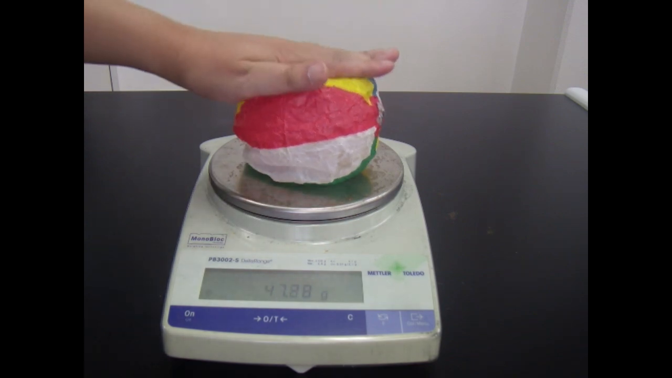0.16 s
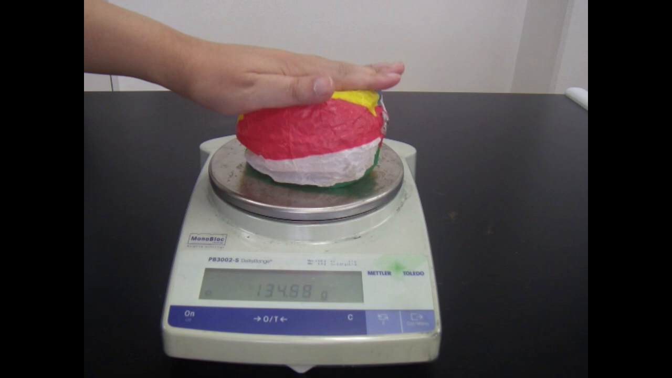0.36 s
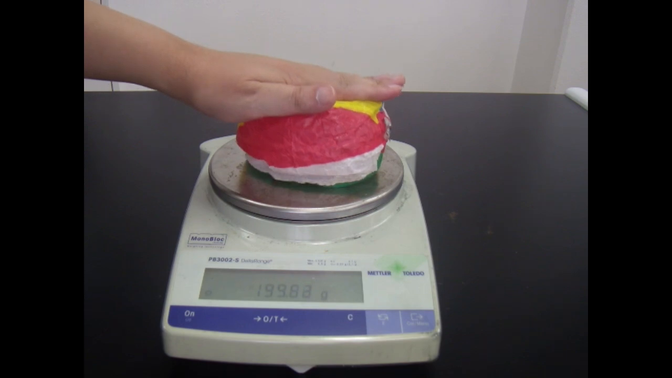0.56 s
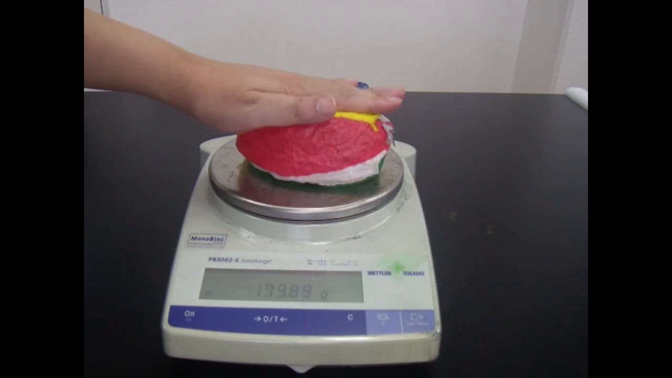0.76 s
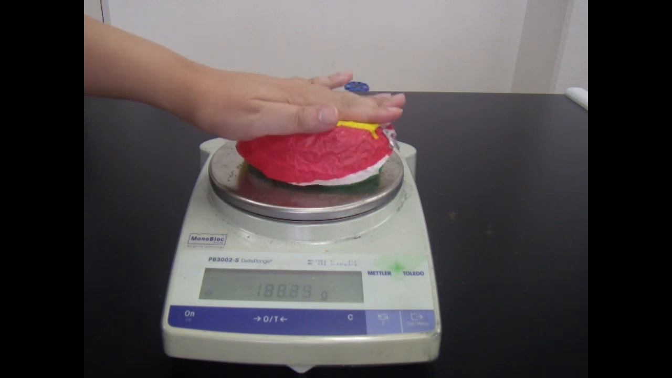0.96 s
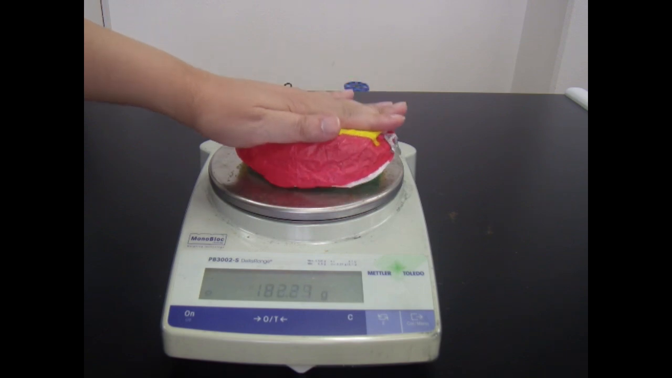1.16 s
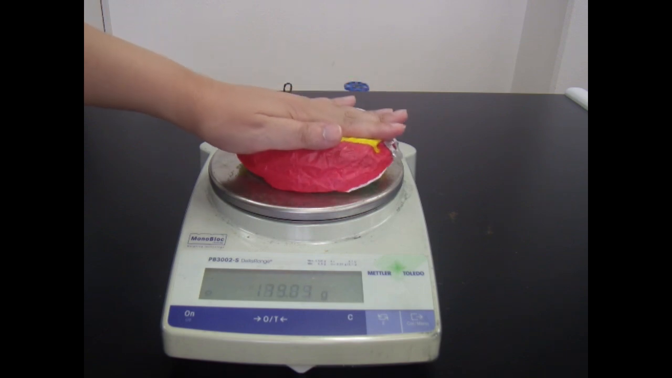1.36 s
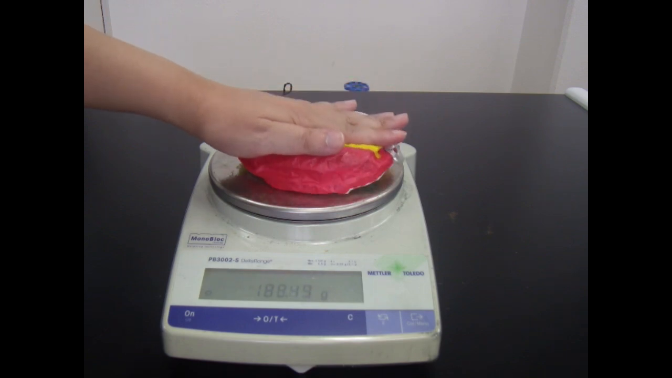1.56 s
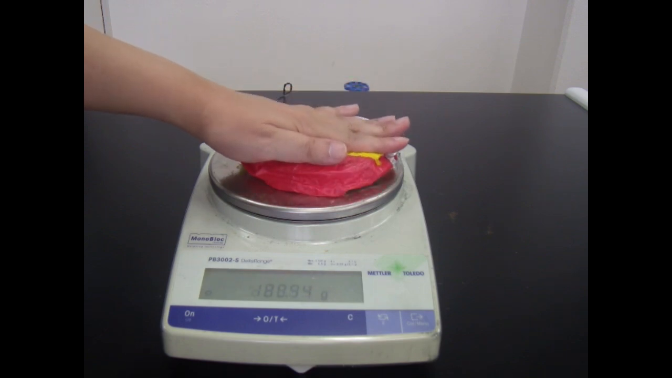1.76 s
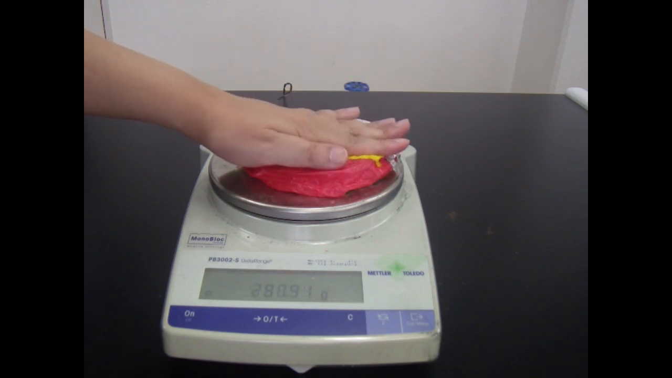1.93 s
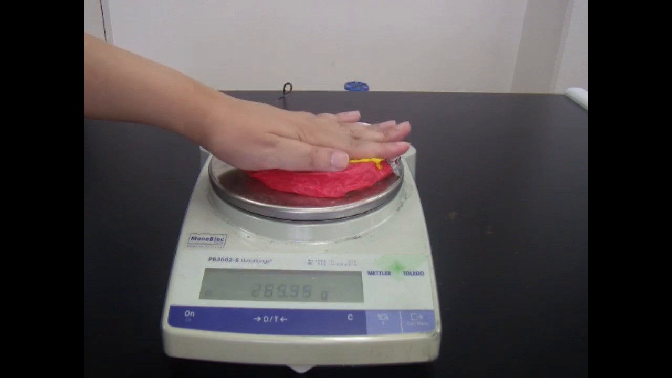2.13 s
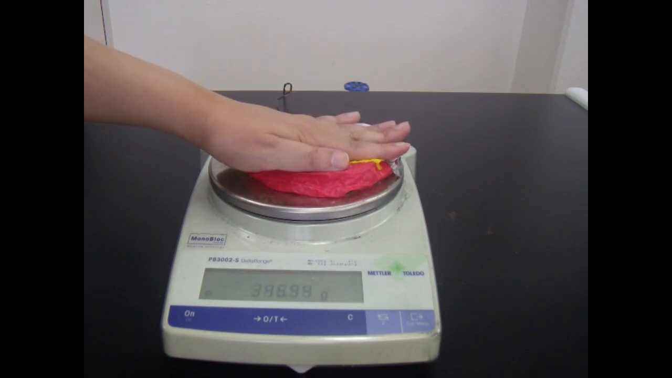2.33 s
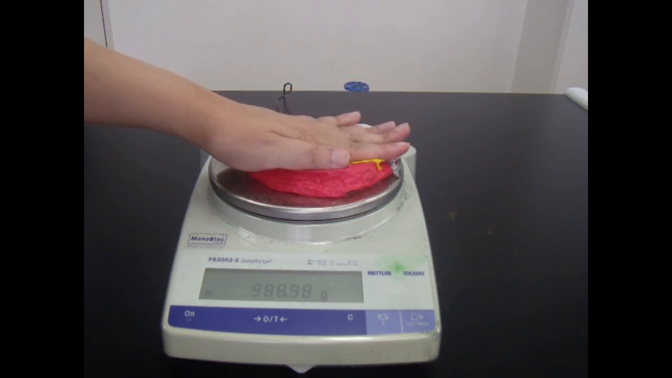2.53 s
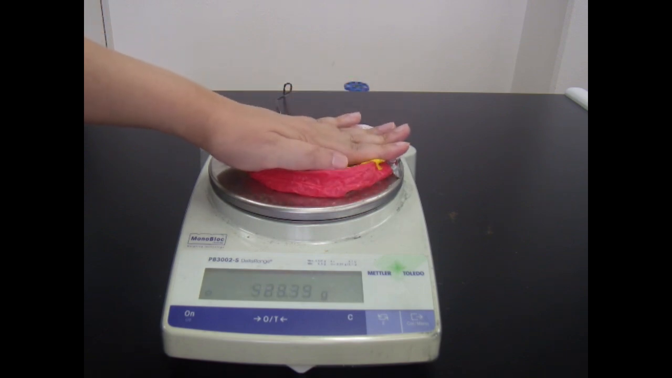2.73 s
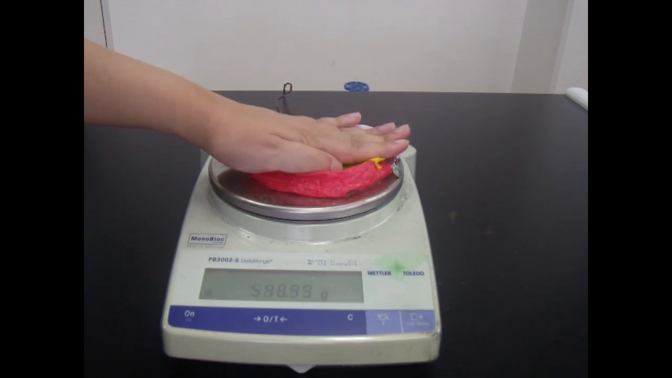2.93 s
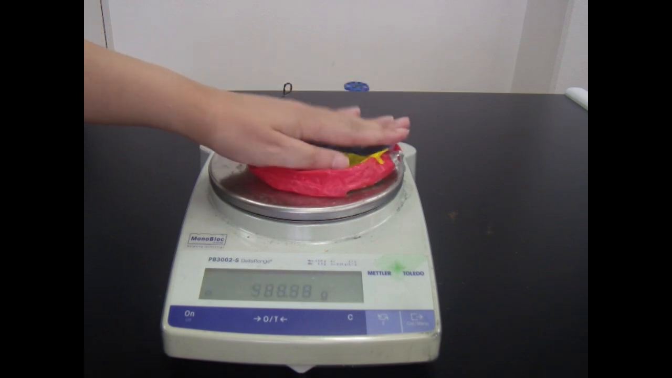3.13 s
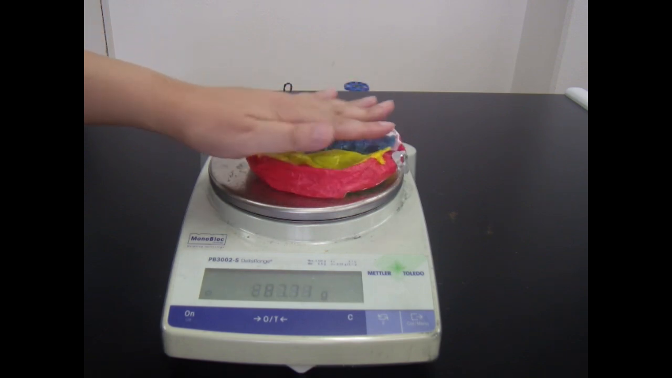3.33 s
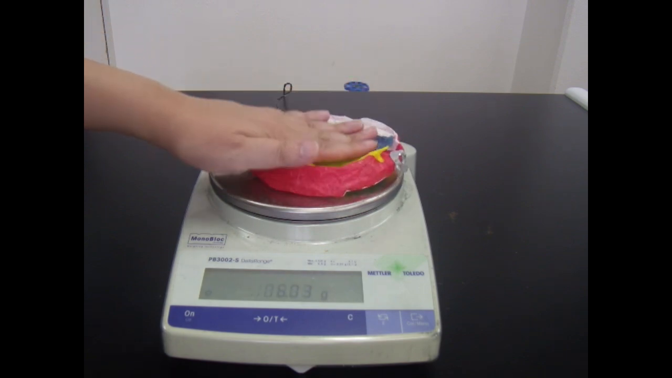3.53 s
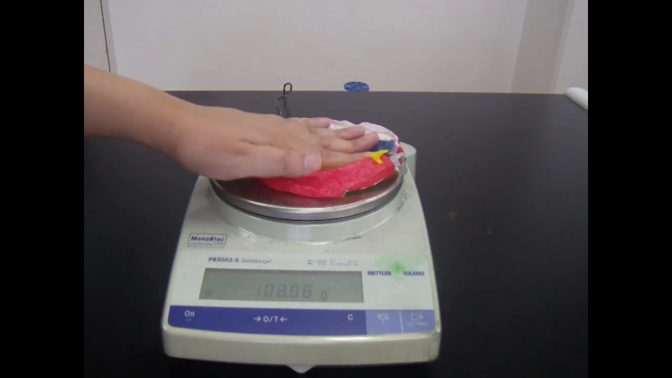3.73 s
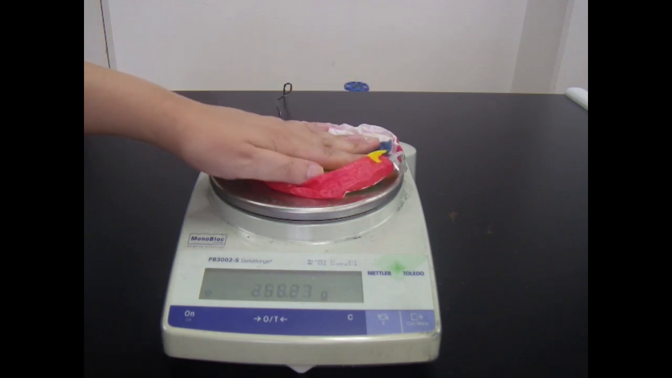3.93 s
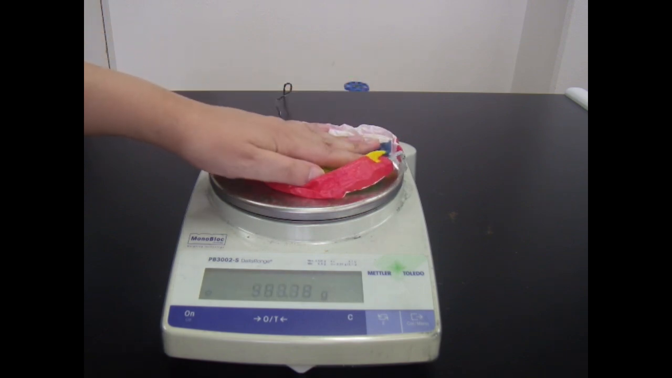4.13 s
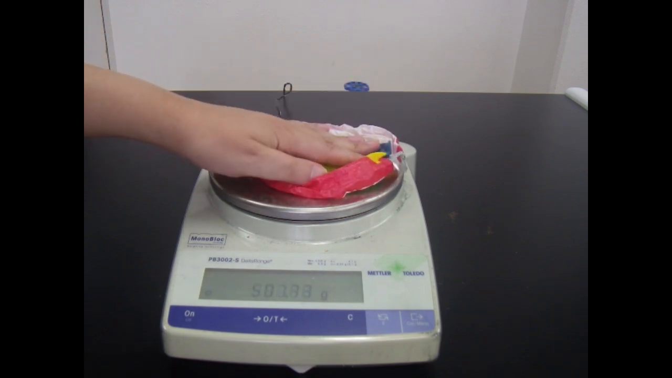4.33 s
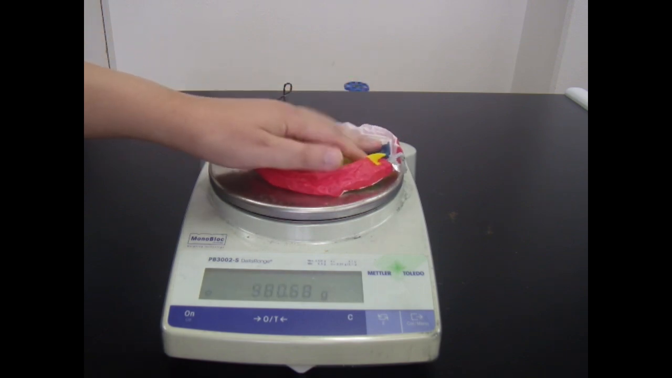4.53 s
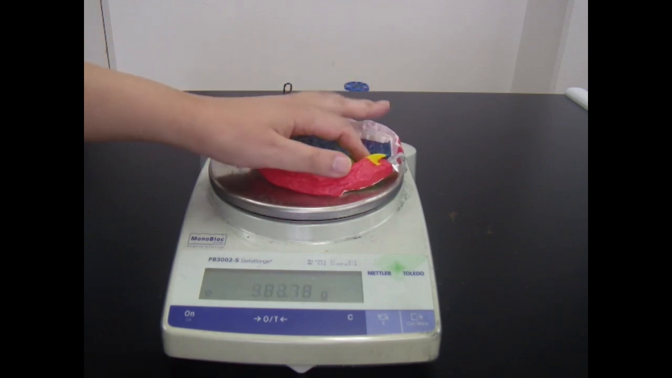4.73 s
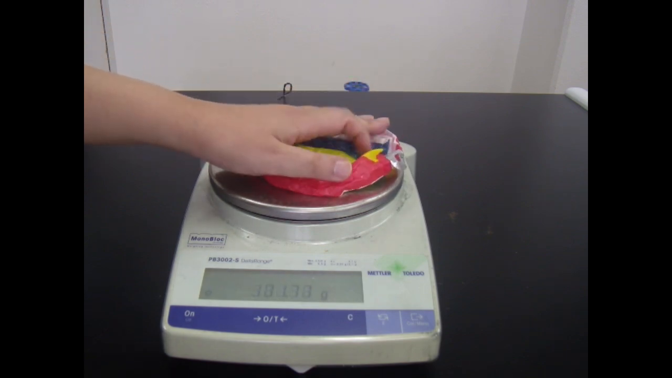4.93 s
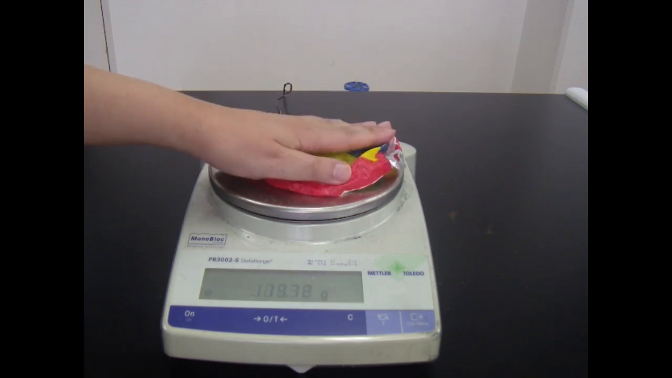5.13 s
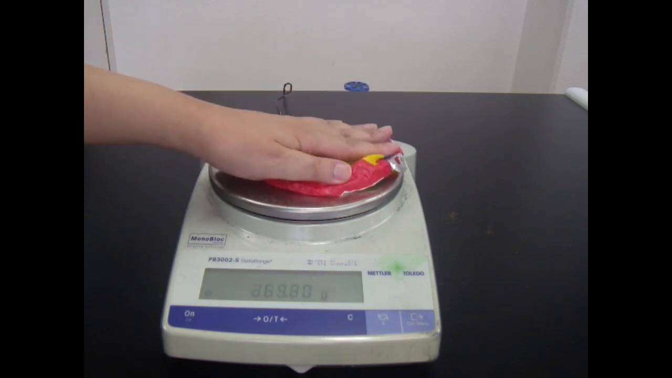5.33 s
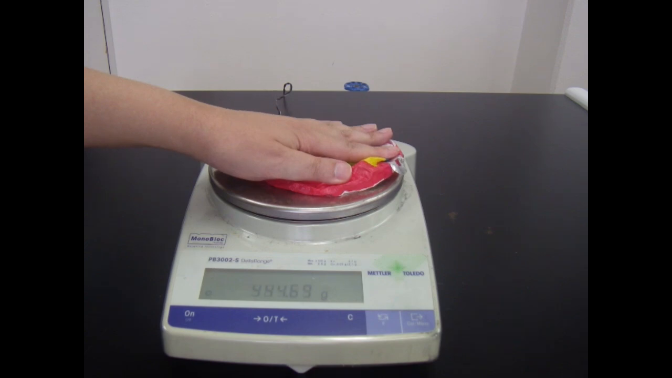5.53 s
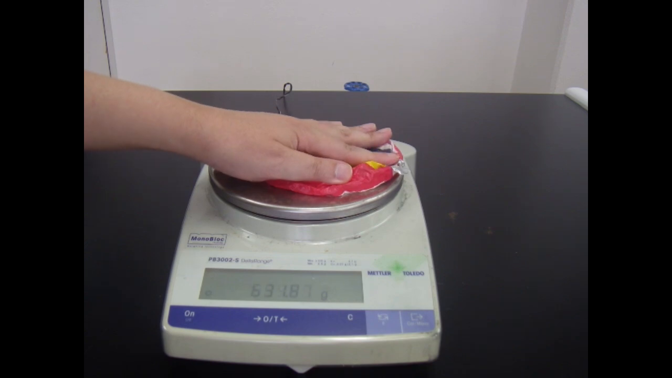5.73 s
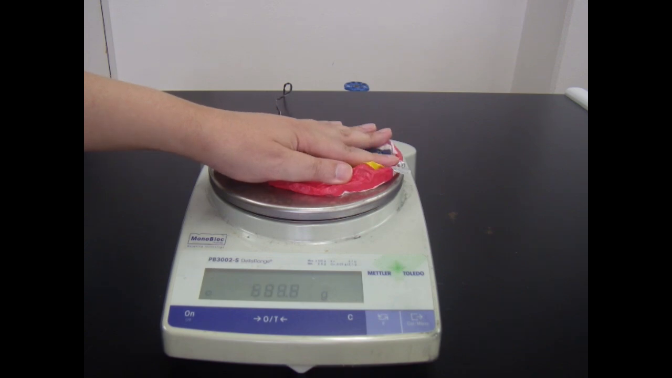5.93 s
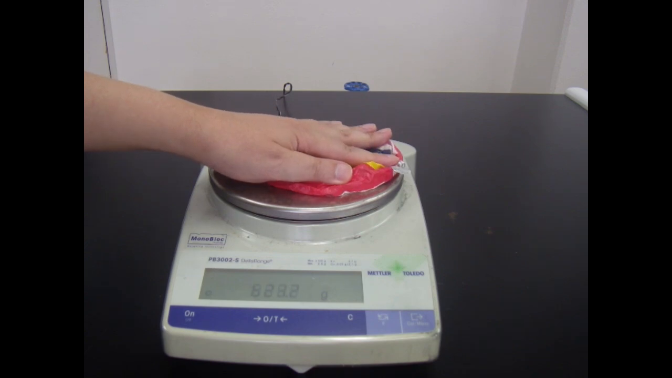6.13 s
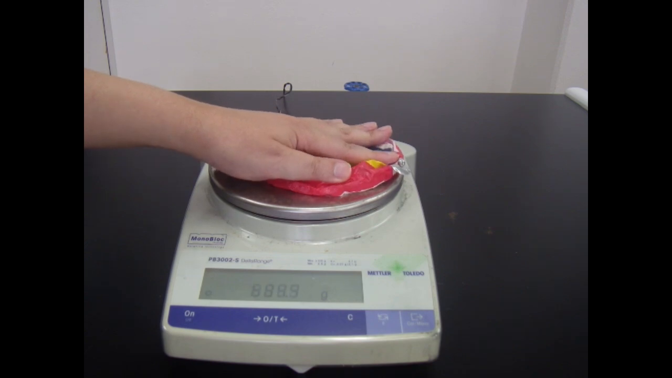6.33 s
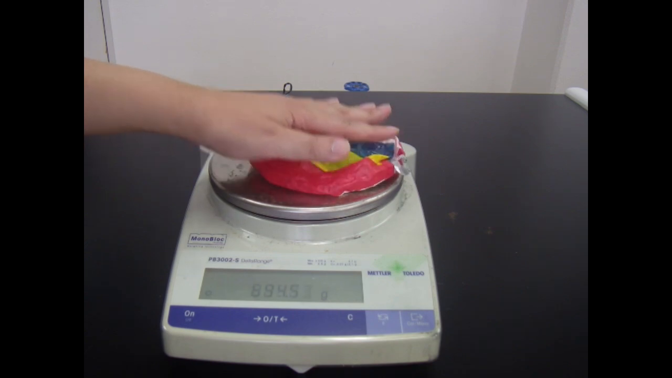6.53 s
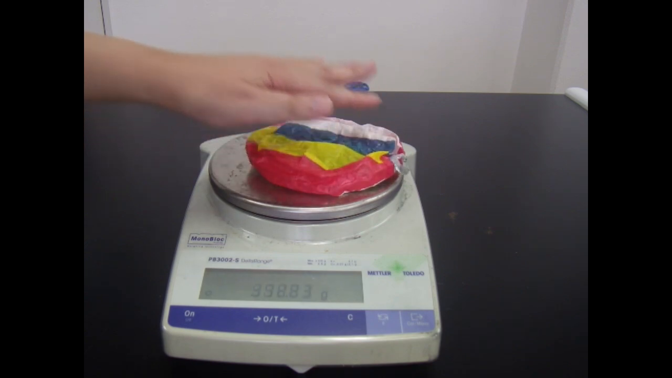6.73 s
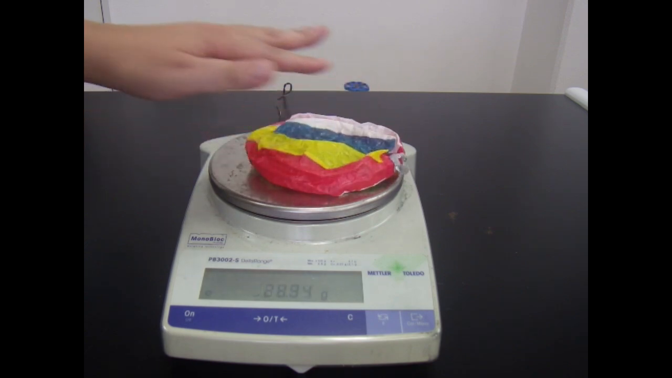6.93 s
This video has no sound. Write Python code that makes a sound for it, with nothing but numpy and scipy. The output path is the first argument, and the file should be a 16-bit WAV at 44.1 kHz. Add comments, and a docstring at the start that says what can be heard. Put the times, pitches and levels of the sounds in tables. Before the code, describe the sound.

A thin paper balloon crinkles and crackles as a hand presses it flat, densely at first, then with more scattered snaps.

```python
"""A thin paper balloon crackles as a hand presses it flat on a metal pan in a quiet room.
Big creases buckle with sharp snaps, each at its own pitch, and the hollow body knocks
when a large patch of paper flips. Finer creases rustle in between as paper rubs on paper.
Faint hiss and a low rumble lie underneath. All of it reaches a small microphone
whose housing rings at a few fixed pitches."""
import sys
import numpy as np
from scipy import signal
from scipy.fft import rfft, irfft
from scipy.io import wavfile

SR = 44100
rng = np.random.default_rng(int(sys.argv[2]) if len(sys.argv) > 2 else 0)


def put_to_file(sound):
    """Save the sound as 16-bit audio at rate SR, in the file named by the first command-line argument."""
    columns = np.atleast_2d(sound).T  # one column per channel
    safe = np.clip(columns, -1, 1)
    whole_steps = np.round(safe * 32767)
    wavfile.write(sys.argv[1], SR, whole_steps.astype(np.int16))


N = 312166


def from_db(db):
    """Turn decibels into a number to multiply a sound by."""
    return 10 ** (np.asarray(db) / 20)


def rms_one(x):
    """Scale a signal so its average power is 1."""
    return x / np.sqrt(np.mean(x ** 2) + 1e-20)


def in_time(rows):
    """Join (seconds, value) points with straight lines, one value per sample."""
    seconds, values = np.transpose(rows)
    return np.interp(np.arange(N) / SR, seconds, values)


def band(x, low_hz, high_hz):
    """Keep the part of a sound between two pitches."""
    return signal.sosfilt(signal.butter(2, [low_hz, high_hz], "band", fs=SR, output="sos"), x)


def drift(rate_hz):
    """A smooth random wobble around zero, with a typical size of 1."""
    r = np.exp(-2 * np.pi * rate_hz / SR)
    return rms_one(signal.lfilter([1], [1, -2 * r, r * r], rng.standard_normal(N + SR))[SR:])


# Big creases buckling. Each row: start in seconds, level in dB, pitch in Hz.
BIG_CREASES = [(0.042, -10.5, 3500), (0.0781, -19.5, 5360), (0.1116, -20, 10700), (0.1507, -15.0, 6200),
               (0.1808, -7, 3660), (0.196, -16, 5940), (0.3109, -11, 5810), (0.319, -12.0, 3460),
               (0.3236, -7, 4300), (0.3423, -10, 6400), (0.4047, -4.5, 6200), (0.5259, -3.5, 4200),
               (0.5837, -12.5, 5130), (0.6281, -13, 3940), (0.653, -9.5, 4440), (0.6823, -10.5, 6560),
               (0.7133, -12, 5900), (0.7333, -19, 4440), (0.7881, -9, 5900), (0.8594, -7.5, 5790),
               (0.8924, -7.5, 4100), (0.9544, -12.0, 4600), (1.0408, -13.5, 4460), (1.1075, -20, 5320),
               (1.1436, -8.5, 4000), (1.1506, -11, 6900), (1.2021, -14.5, 4630), (1.2239, -15, 4640),
               (1.3964, -15, 4540), (1.4133, -6.5, 7100), (1.448, -11, 5960), (1.468, -6, 4460),
               (1.4852, -5, 5400), (1.5326, -9.5, 4930), (1.5384, -6, 5980), (1.5652, -10.5, 3600),
               (1.574, -12.5, 9350), (1.6387, -8.5, 7320), (1.7087, -5.5, 4940), (1.727, -14, 4760),
               (1.8125, -13.5, 4700), (1.885, -10.5, 5830), (1.9263, -16.0, 6700), (1.9431, -11, 4860),
               (1.9693, -14.5, 4660), (2.0472, -15.5, 3660), (2.226, -18, 4440), (2.2779, -13, 5700),
               (2.2886, -10, 4170), (2.3543, -10, 4400), (2.384, -15, 4500), (2.525, -26, 5400),
               (2.535, -12.5, 4580), (2.5987, -9.5, 7900), (2.6148, -6.5, 5000), (2.8, -16.0, 5470),
               (2.8526, -15, 4730), (2.9806, -9.5, 4920), (3.2958, -8.5, 5370), (3.4318, -15.5, 5700),
               (3.4417, -13, 4390), (3.4545, -18, 3600), (3.5951, -6.5, 7450), (3.6778, -14.5, 4700),
               (3.7082, -12, 4620), (3.7178, -15, 5100), (3.7211, -7.5, 5700), (3.803, -17, 4550),
               (3.822, -18, 5900), (3.835, -14, 3160), (3.9228, -17, 6640), (3.9652, -19.5, 5800),
               (4.0385, -17, 5120), (4.066, -18, 5530), (4.0884, -10.5, 5600), (4.1628, -16.5, 4970),
               (4.1675, -22, 11200), (4.1919, -21.5, 9300), (4.1975, -17, 5880), (4.3061, -12.5, 7050),
               (4.3282, -8.5, 6610), (4.4211, -6, 5200), (4.4989, -6.5, 5870), (4.523, -11, 4550),
               (4.7758, -18.5, 11750), (4.7891, -15, 5870), (4.8006, -15.5, 6370), (4.851, -12, 5370),
               (4.9268, -14, 5880), (4.9433, -10, 5100), (4.9856, -12, 5100), (5.144, -13.5, 5640),
               (5.2289, -15.5, 6900), (5.2339, -8.5, 5170), (5.3296, -13, 5450), (5.5063, -16.5, 5800),
               (5.558, -11, 5400), (5.5994, -14, 5800), (5.6928, -12.5, 7340), (5.6993, -14, 3230),
               (5.913, -17.5, 3700), (5.9455, -24, 6360), (6.0377, -19, 5120), (6.1204, -24.5, 5400),
               (6.1357, -21, 4600), (6.373, -15, 5320), (6.3876, -7.5, 5230), (6.5036, -15.5, 7700),
               (6.68, -17.5, 3650), (6.7044, -12.5, 5100), (6.7095, -21.5, 7130), (6.7679, -15.5, 5200),
               (6.952, -14.5, 8170)]

def snaps():
    """Big creases buckle one by one: each rings at its pitch over a weaker puff of noise."""
    start_s, level_db, hz = np.transpose(BIG_CREASES)
    starts = (start_s * SR).astype(int)
    puff_db = -5.5
    return creases(starts, level_db + puff_db, hz, scatter_db=2, ring_db=-puff_db, skirt_db=-15)


# The bands of the paper's noise. Each row: low edge in Hz, high edge in Hz, relative strength in dB.
PAPER_BANDS = [(285, 1360, -15.5), (1229, 1590, -6.5), (1875, 2435, -9), (2250, 3400, -10),
               (3754, 4345, -10.5), (4560, 5840, -5.5), (6250, 7750, -9.5), (7600, 11400, -6.5),
               (12000, 21000, -14)]

def creases(starts, level_db, pitch_hz, scatter_db, ring_db, skirt_db=-10.5, rub=0):
    """Each crease rings and puffs noise: most near its pitch, plus a weak 'skirt' in every band."""
    low, high, band_db = np.transpose(PAPER_BANDS)
    octaves_away = np.log2(np.sqrt(low * high)[:, None] / pitch_hz)
    near_pitch = from_db(-12 * octaves_away ** 2)
    share = from_db(band_db)[:, None] * (near_pitch + from_db(skirt_db))
    share *= from_db(scatter_db * rng.standard_normal((len(starts), len(low)))).T
    share = share / np.sqrt(np.sum(share ** 2, axis=0)) * from_db(level_db)
    # Rubbing is duller than buckling: it loses 10 dB per octave above 5000 Hz.
    dulling_db = -10 * np.maximum(np.log2(low / 5000), 0)
    band_rub = from_db(band_db + dulling_db)[:, None] * rub
    # The lowest band fades as the balloon loses its air.
    emptying_db_per_s = -1.5
    share[0] *= from_db(emptying_db_per_s * starts / SR)
    band_rub[0] *= from_db(emptying_db_per_s * np.arange(band_rub.shape[1]) / SR)
    noise = sum(puffs(np.bincount(starts, sizes, N), low_hz, high_hz, rubbing)
                for sizes, low_hz, high_hz, rubbing in zip(share, low, high, band_rub))
    return noise + rings(starts, level_db + ring_db, pitch_hz, fade_s=.0065)


def puffs(clicks, low_hz, high_hz, rub):
    """In one band, each click cracks and puffs noise, over rubbing and a faint echo from the walls."""
    shorten = min(1, 5000 / low_hz)   # treble dies fastest
    puff_s, echo_s = .006 * shorten, .09 * shorten   # time to fade by 60 dB
    rise_s, echo_db, crack_db = .00015, -23, 2.5
    puff = signal.lfilter([1], [1, -from_db(-60 / (puff_s * SR))], clicks + 1e-12)
    echo_power = signal.lfilter([1], [1, -from_db(-120 / (echo_s * SR))], clicks ** 2 + 1e-18)
    r = np.exp(-1 / (rise_s * SR))
    softened_puff = signal.lfilter([1 - r], [1, -r], puff)
    loudness = softened_puff + from_db(echo_db) * np.sqrt(echo_power) + rub
    source = loudness * rng.choice([-1., 1.], N) + from_db(crack_db) * clicks
    return band(source, low_hz, high_hz) * np.sqrt(SR / 2 / (high_hz - low_hz))


def rings(starts, level_db, hz, fade_s):
    """Each ring builds up over its first cycle and dies away by 60 dB in fade_s seconds."""
    age = np.arange(900)   # in samples
    cycles = hz[:, None] * age / SR
    rise = 1 - np.exp(-cycles)
    fade = from_db(level_db[:, None] - 60 * age / SR / fade_s)
    tones = rise * fade * np.sin(2 * np.pi * cycles)
    return np.bincount((starts[:, None] + age).ravel(), tones.ravel(), N + len(age))[:N]


# Large patches of paper flipping. Each row: start in seconds, level in dB, pitch in Hz.
PATCH_FLIPS = [(0.161, -10, 1250), (0.186, -13.5, 1940), (0.312, -13.5, 1480), (0.5255, -13.5, 2350),
               (0.6144, -10, 1360), (0.628, -11.5, 1460), (0.658, -22.5, 790), (0.8473, -11, 1390),
               (0.8917, -15, 1400), (0.9549, -13, 2000), (1.1508, -11, 1990), (1.4472, -11.5, 1310),
               (1.4675, -12.5, 2170), (1.564, -6.5, 2020), (2.3541, -10.5, 1370), (2.715, -14.5, 1420),
               (4.3279, -15, 1360), (4.943, -16.5, 2090), (6.531, -26, 1460), (6.7044, -17, 2580)]

def knocks():
    """A patch flips with a crack, and the balloon's hollow body rings low."""
    start_s, level_db, hz = np.transpose(PATCH_FLIPS)
    starts = (start_s * SR).astype(int)
    crack = creases(starts, level_db - 12, hz, scatter_db=2, ring_db=0)
    return rings(starts, level_db, hz, fade_s=.011) + crack


# The hand's steady weight on the paper. Each row: time in seconds, rustle level in dB.
HAND_WEIGHT = [(0, -28.5), (.75, -28.5), (1.3, -27), (2.1, -31), (2.9, -30.5), (3.14, -31), (3.2, -41),
               (3.4, -51), (3.46, -31), (4.1, -33), (4.7, -36), (5.1, -28.5), (5.8, -35.5), (6.08, -41.5),
               (6.3, -29), (6.48, -41.5), (6.62, -53), (7.08, -46)]
# Folds giving way. Each row: start in seconds, length in seconds, rustle level in dB.
FOLD_CRUMPLES = [(0.154, 0.067, -23.5), (0.312, 0.031, -22), (0.443, 0.095, -29), (0.598, 0.21, -24.5),
                 (0.824, 0.14, -24), (2.71, 0.039, -25.5), (2.962, 0.14, -29), (3.441, 0.018, -25),
                 (3.52, 0.069, -28.5), (4.319, 0.18, -25.5), (4.578, 0.013, -23.5), (4.915, 0.12, -25),
                 (5.511, 0.025, -24), (6.349, 0.064, -28.5), (6.682, 0.084, -40)]

def pressing_db():
    """The rustle's level: the hand's steady press, plus crumples that start fast, hold and settle."""
    rise_db_per_s, fall_db_per_s = 622, 337
    t = np.arange(N) / SR
    power = from_db(2 * in_time(HAND_WEIGHT))   # doubling the dB gives power
    for start, length, level_db in FOLD_CRUMPLES:
        early, late = np.maximum(start - t, 0), np.maximum(t - start - length, 0)
        power += from_db(2 * (level_db - rise_db_per_s * early - fall_db_per_s * late))
    return 10 * np.log10(power)


def rustle(per_s=130, clump_db=2.5, spread_octaves=.45, rub_db=-13, flutter_db=4):
    """Small creases come in loose clumps, uneven in size and pitch; paper rubs on paper beneath them."""
    press_db = pressing_db()
    chance = per_s * from_db(clump_db * drift(40)) / SR
    starts = np.flatnonzero(rng.random(N) < chance)
    size_db = np.minimum(10 * rng.exponential(1, N), 11) - 7   # from -7 to +4 dB
    pitch_hz = np.clip(5000 * 2 ** (spread_octaves * rng.standard_normal(N)), 3000, 11000)
    rub = from_db(press_db + rub_db + flutter_db * drift(56))
    level_db = press_db[starts] + size_db[starts]
    return creases(starts, level_db, pitch_hz[starts], scatter_db=4.5, ring_db=-3, rub=rub)


# The tone of the hiss. Each row: pitch in Hz, relative strength in dB.
HISS_TONE = [(150, -27), (450, -8.5), (900, -12), (1350, 2), (1800, -12.5), (4500, -4.5), (13000, -20.5),
             (16500, -22)]

def hiss(level_db=-49.5):
    """A faint, steady hiss, stronger at some pitches than at others."""
    hz = np.arange(1, N // 2 + 2) * SR / N
    point_hz, point_db = np.transpose(HISS_TONE)
    shape = from_db(np.interp(np.log(hz), np.log(point_hz), point_db))
    noise = irfft(rfft(rng.standard_normal(N)) * shape, N)
    return from_db(level_db) * rms_one(noise)


# How loud the background rumble is heard. Each row: time in seconds, level in dB.
RUMBLE_LEVELS = [(0, -58.5), (1.8, -66), (2.5, -60), (4.4, -61), (7.08, -58.5)]

def background_rumble():
    """A soft, low background rumble whose level dips and recovers."""
    return from_db(in_time(RUMBLE_LEVELS)) * rms_one(band(rng.standard_normal(N), 41, 256))


def scene():
    """Add the paper sounds and the background into one channel."""
    return (snaps() + knocks() + rustle() + hiss() + background_rumble())[None]


# Bands the microphone's housing lifts or cuts. Each row: pitch in Hz, width in Hz, change in dB.
HOUSING_BANDS = [(479, 116, 5), (1043, 188, -5.5), (2042, 61, 4), (4820, 360, 5.5), (5630, 410, 4.5),
                 (6570, 130, -7), (6840, 1140, 6), (8490, 250, -4.5), (790, 92, 3)]
# The housing's deep, narrow cuts. Each row: pitch in Hz, width in Hz, change in dB.
HOUSING_NOTCHES = [(7410, 60, -14), (14830, 100, -8)]

def record(dry, cutoff_hz=16000):
    """The housing lifts and cuts narrow bands; then peaks are capped and the highest treble is cut."""
    for hz, width_hz, change_db in HOUSING_BANDS + HOUSING_NOTCHES:
        gain, width = from_db(change_db / 2), np.pi * width_hz / SR
        tuning = -2 * np.cos(2 * np.pi * hz / SR)
        forward = [1 + width * gain, tuning, 1 - width * gain]
        feedback = [1 + width / gain, tuning, 1 - width / gain]
        dry = signal.lfilter(forward, feedback, dry)
    treble_cut = signal.cheby2(24, 45, cutoff_hz, fs=SR, output="sos")
    return signal.sosfilt(treble_cut, np.clip(dry, -.95, .95))


dry = scene()
out = record(dry)
put_to_file(out)
```